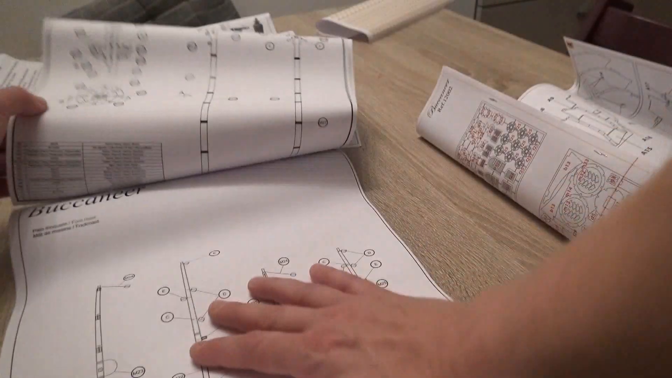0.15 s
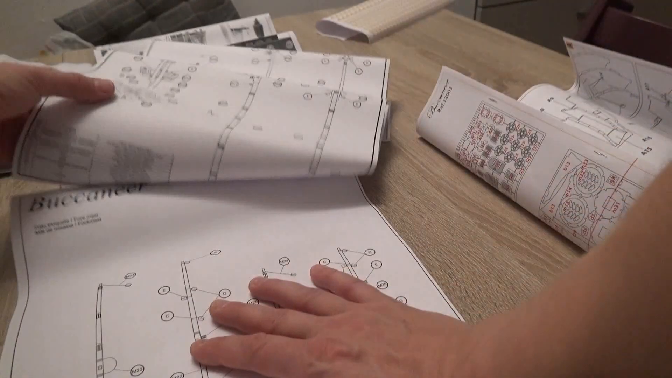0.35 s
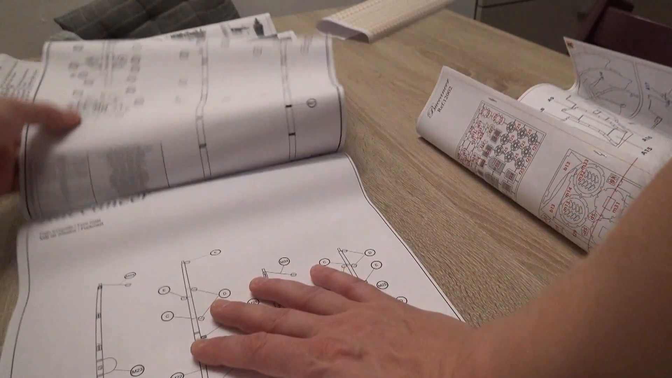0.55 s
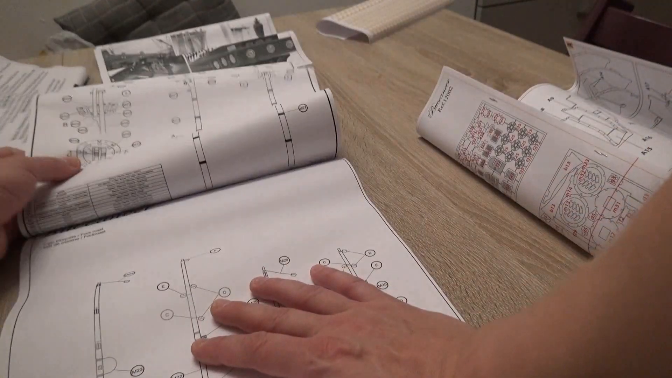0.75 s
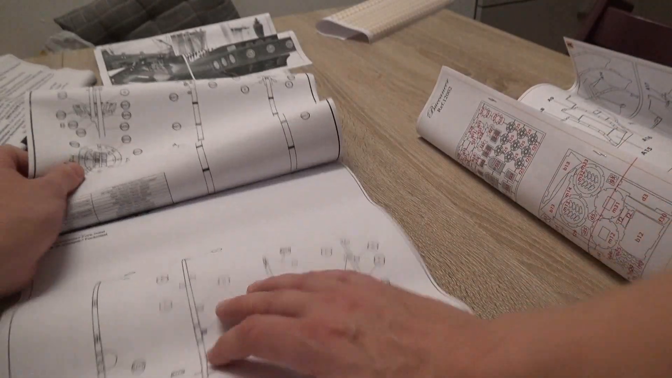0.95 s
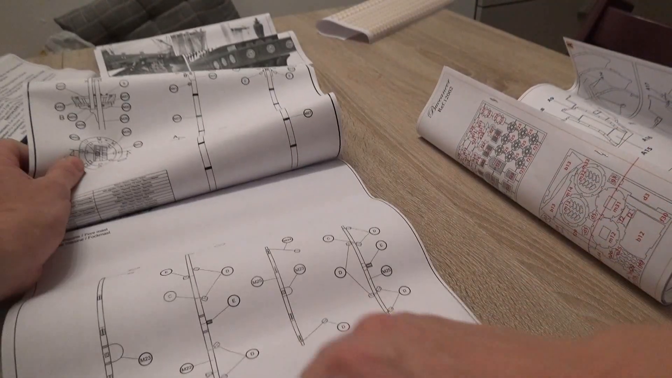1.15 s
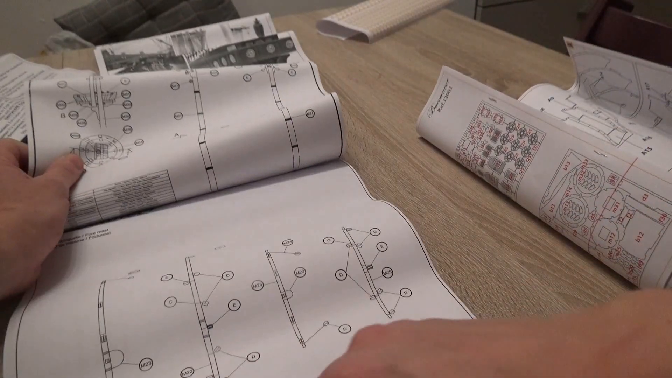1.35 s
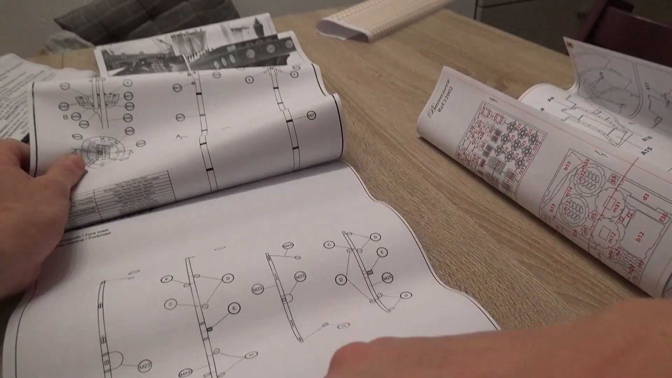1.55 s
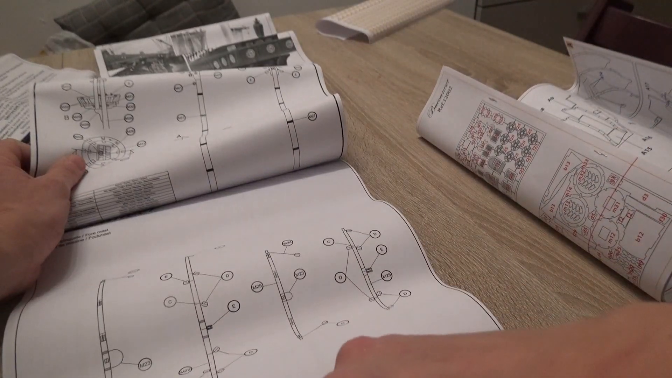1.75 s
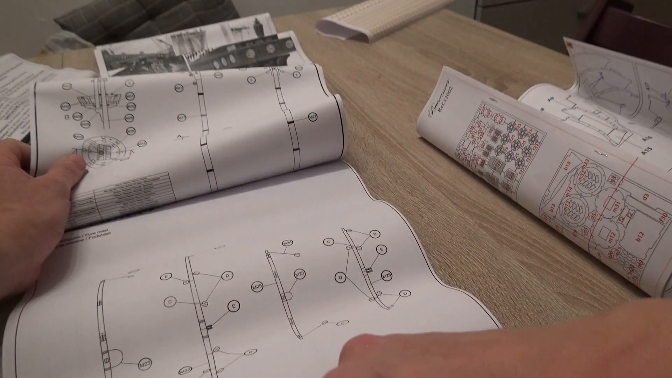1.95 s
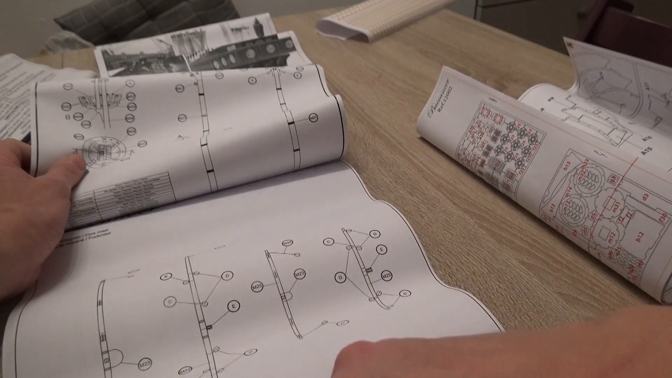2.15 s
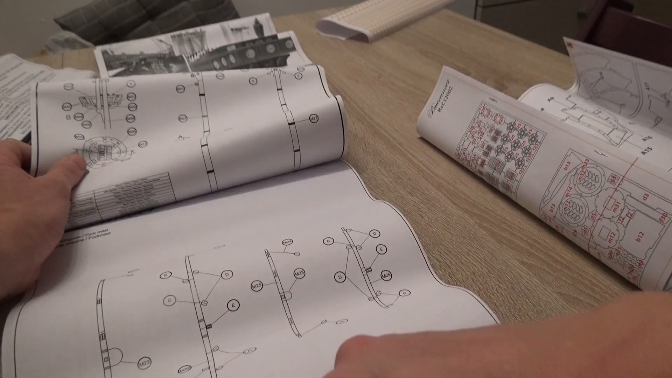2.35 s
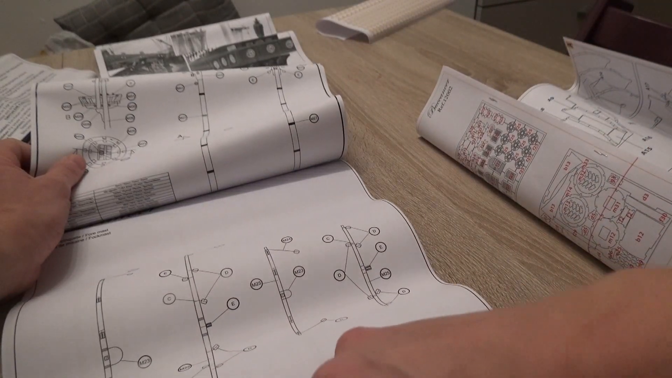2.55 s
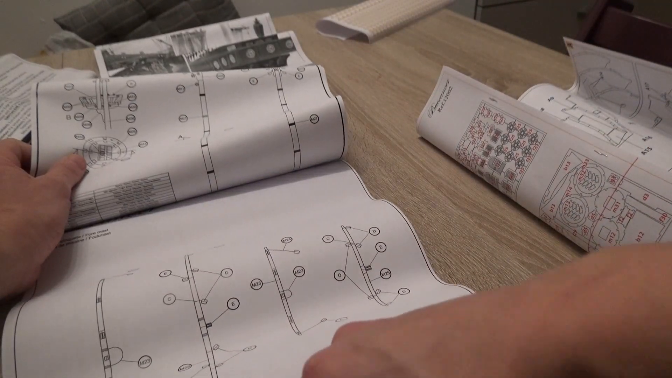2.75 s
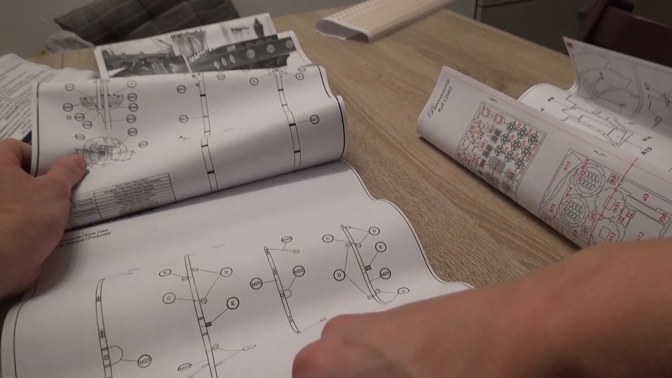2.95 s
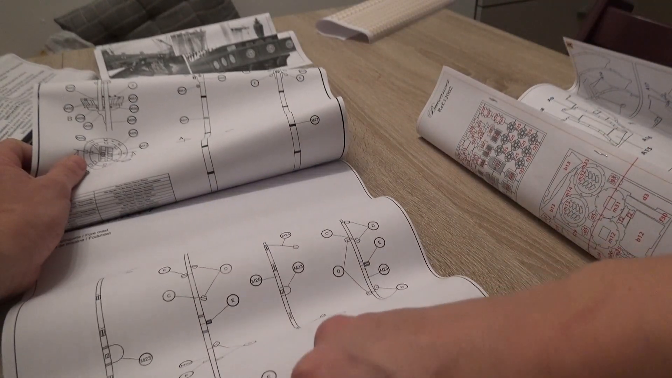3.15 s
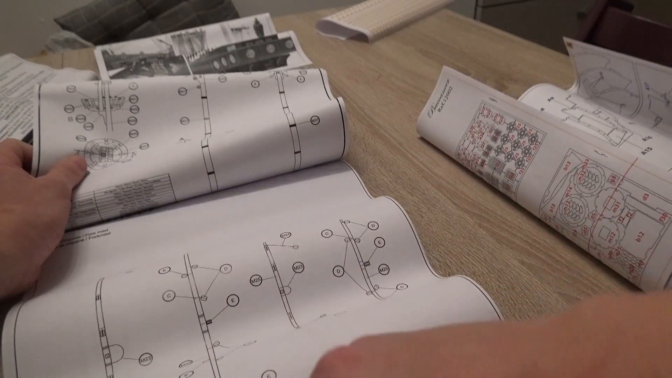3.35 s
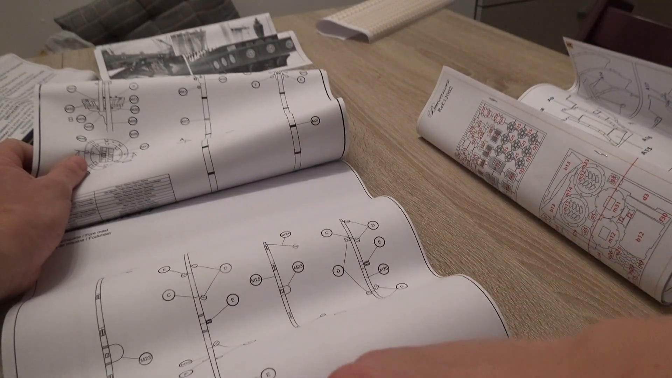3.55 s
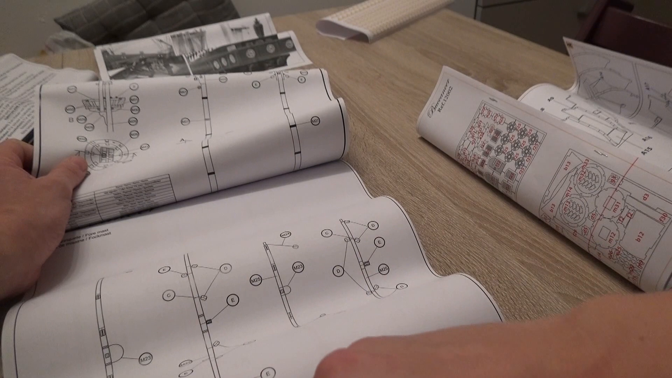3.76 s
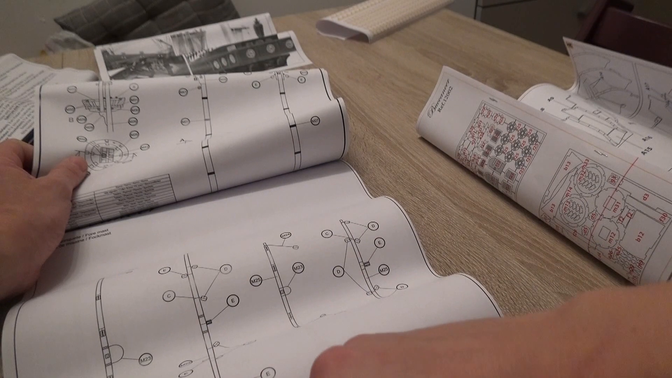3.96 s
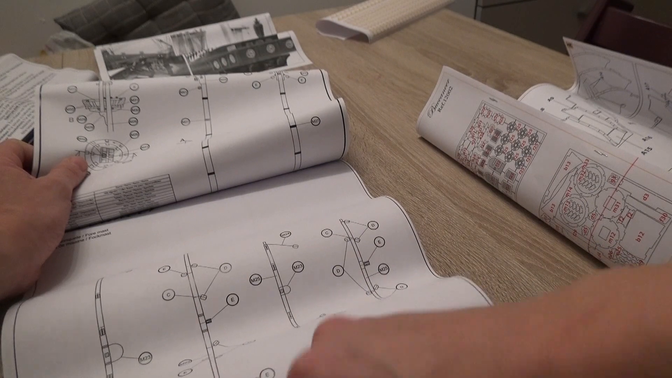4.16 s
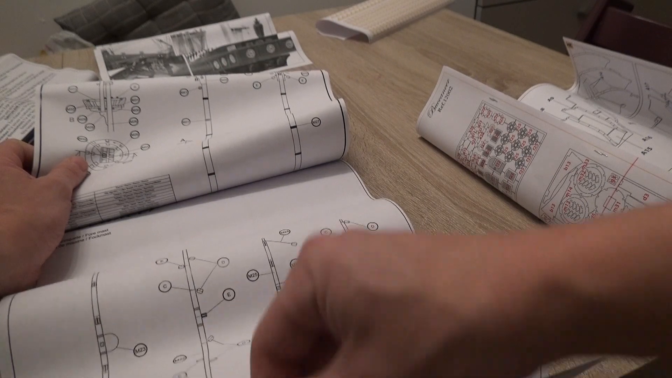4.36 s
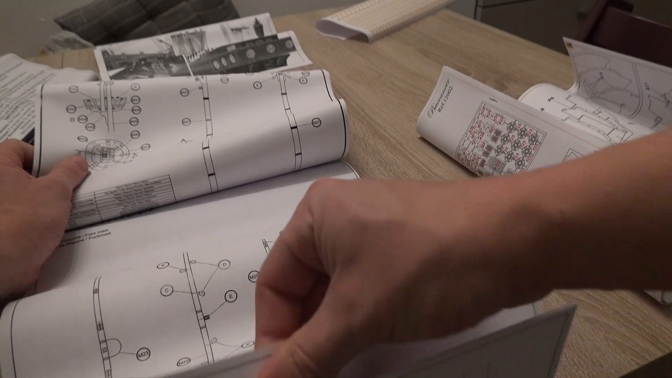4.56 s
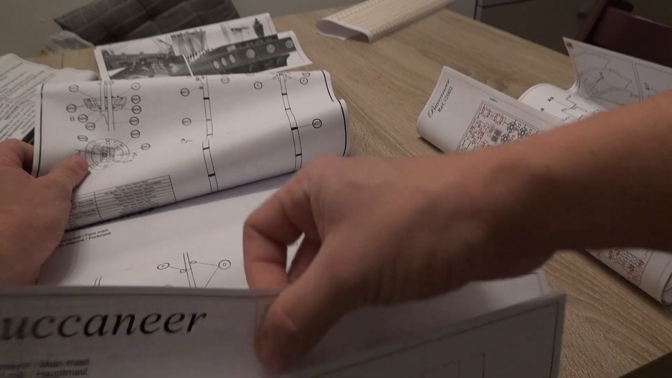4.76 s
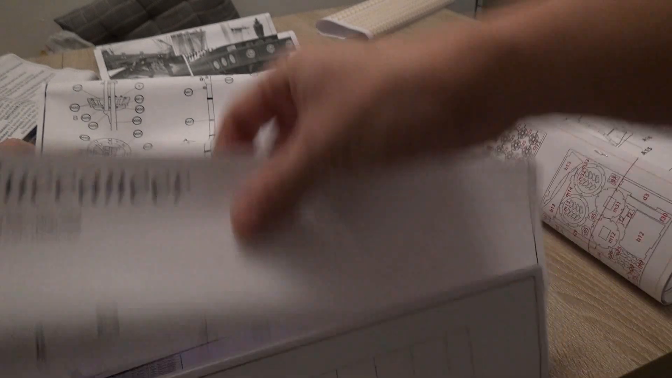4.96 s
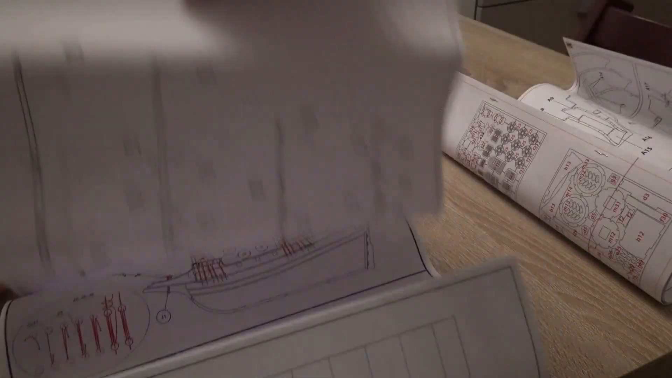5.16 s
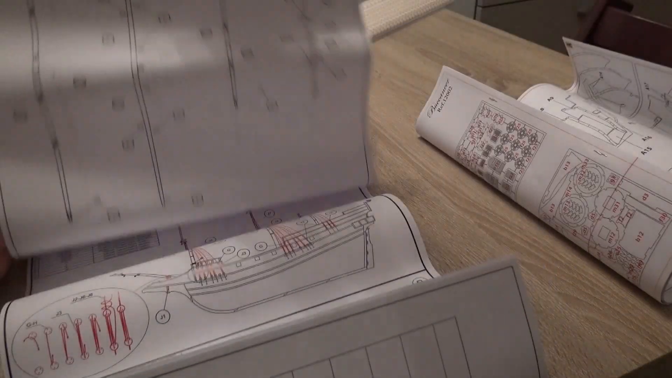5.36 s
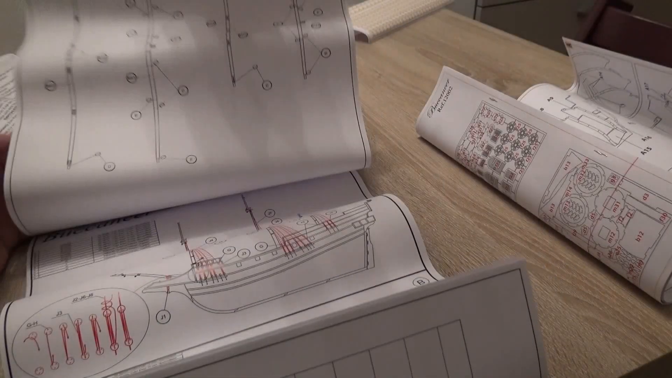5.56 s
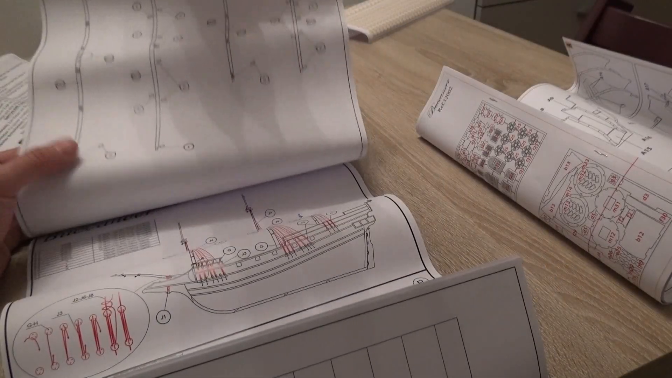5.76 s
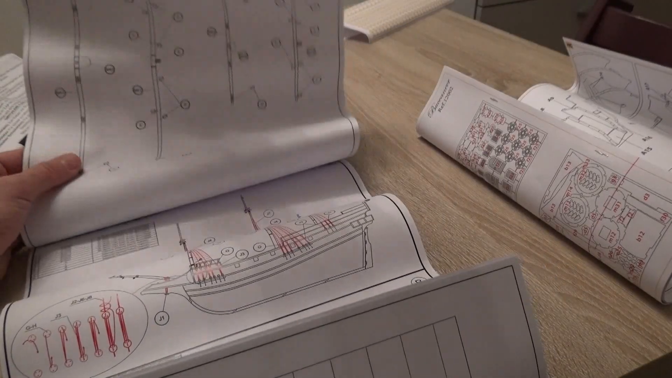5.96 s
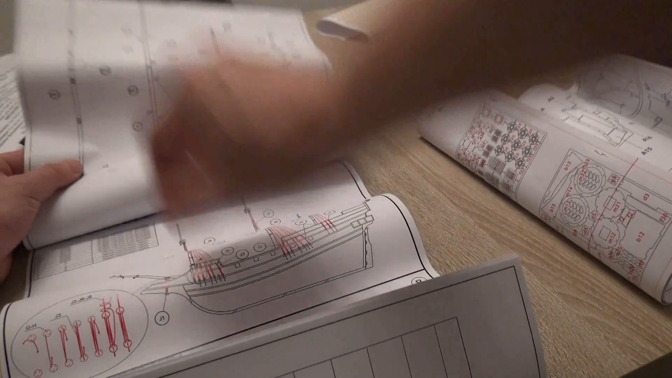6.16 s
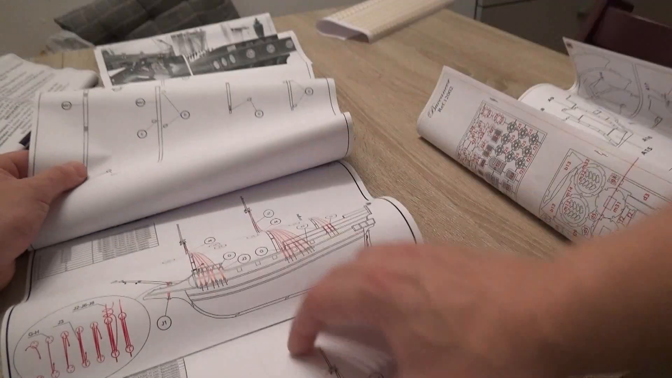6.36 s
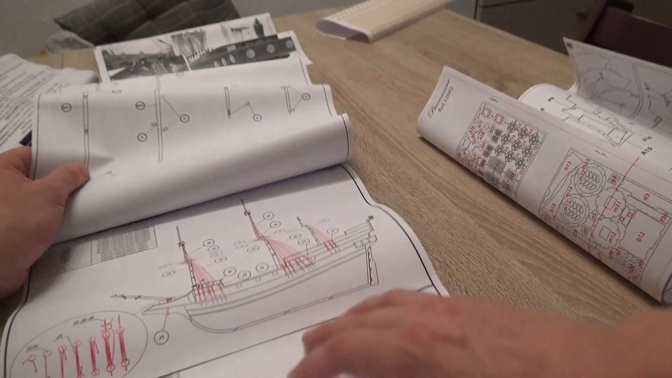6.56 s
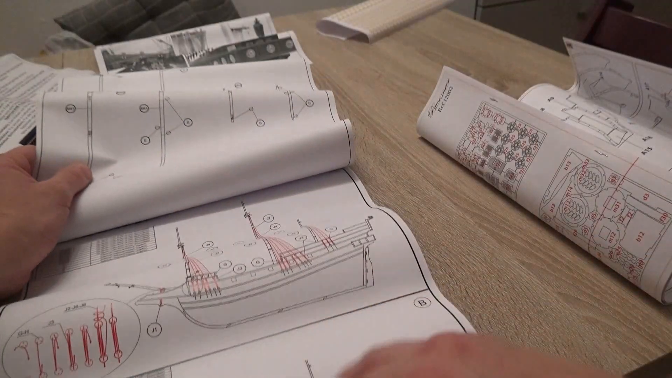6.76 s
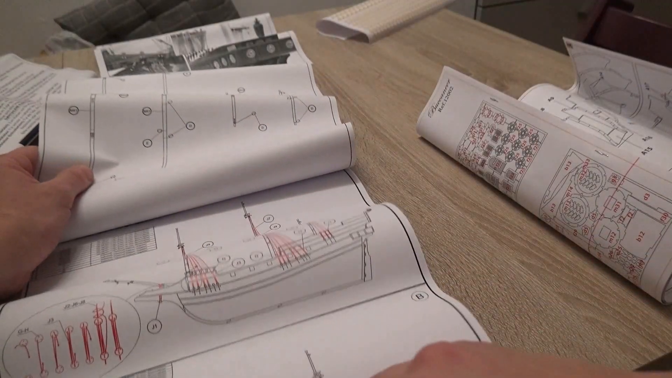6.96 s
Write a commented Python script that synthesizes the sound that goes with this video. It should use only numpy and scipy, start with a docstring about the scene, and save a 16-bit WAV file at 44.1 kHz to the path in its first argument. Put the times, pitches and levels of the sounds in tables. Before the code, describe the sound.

Close paper handling indoors: hollow pops, sharp crease snaps and grainy sliding, a quieter stretch of small rustles, then another sheet flipped over.

```python
"""Hollow pops and crumpling of bowed paper come at once, with a grainy hiss; large sheets are turned by hand.
Sliding is coloured grains under swelling gains; bending is grains ringing near 1 kHz plus low noise for wobble and air.
Pops, crease snaps and table bumps are short coloured bursts; a catching edge is a quick run of noise scrapes.
A soft low hum marks a sailing sheet. The small room adds a short tail and a faint steady noise."""
import sys
import numpy as np
from scipy import signal
from scipy.io import wavfile
from scipy.ndimage import uniform_filter1d

SR = 44100
rng = np.random.default_rng(int(sys.argv[2]) if len(sys.argv) > 2 else 0)


def to_wav(sig):
    """Store sig (one row per channel, or 1-D mono) as 16-bit WAV at the path in sys.argv[1].

    Samples outside -1..1 are clipped; the rate is SR.
    """
    pcm = np.clip(np.atleast_2d(sig), -1, 1) * 32767
    pcm = np.round(pcm).astype(np.int16)
    wavfile.write(sys.argv[1], SR, pcm.T)  # frames by channels


N = 308700


def amp(db):
    """Decibels to gain."""
    return 10 ** (np.asarray(db) / 20)


def unit(x):
    """Scales to rms 1."""
    return x / np.sqrt(np.mean(x ** 2) + 1e-20)


def read(points, hz):
    """Interpolates a spectrum on a log-frequency axis."""
    f, value = np.transpose(points)
    return np.interp(np.log(hz + 1e-6), np.log(f), value)


def curve(points):
    """Interpolates a (t/s, value) table to one value a sample."""
    s, value = np.transpose(points)
    return np.interp(np.arange(N) / SR, s, value)


def add(mix, start_s, sound):
    """Adds a sound to the mix in place, cut at the end."""
    part = mix[max(round(start_s * SR), 0):][:len(sound)]
    part += sound[:len(part)]


def colour(x, points, stretch=1, size=2048):
    """Minimum-phase filter, so attacks stay sharp; stretch multiplies the frequencies of its spectrum."""
    hz = abs(np.fft.fftfreq(size, 1 / SR)) / stretch
    log_gain = np.log(amp(read(points, hz)))
    response = np.exp(np.conj(signal.hilbert(log_gain)))
    taps = np.fft.ifft(response).real
    return signal.oaconvolve(x, taps[:size // 2])[:len(x)]


def noise(points, size=2048):
    """Steady coloured noise of rms 1."""
    return unit(colour(rng.standard_normal(N), points, size=size))


def grains(per_s, spread_db, smooth):
    """Tiny slips of uneven size over a bed of countless smaller ones."""
    size_db = spread_db * np.minimum(rng.exponential(1, N), 4)
    sizes = amp(size_db) * rng.choice([-1, 1], N)
    struck = rng.random(N) < per_s / SR
    return unit(unit(sizes * struck) + smooth * rng.standard_normal(N))


def flutter(depth_db, size):
    """Uneven contact pressure: random gain, smoothed twice over size samples."""
    drift = uniform_filter1d(uniform_filter1d(rng.standard_normal(N), size), size)
    return amp(depth_db * unit(drift))


def burst(points, centre_hz, decay_s, size=4096):
    """Dying cluster of clicks, coloured; its strongest 3 ms have rms 1."""
    t = np.arange(size) / SR
    cluster = rng.choice([-1, 1], size) * np.exp(-t / max(decay_s, 1e-4))
    x = colour(cluster, points, centre_hz)
    return x / np.sqrt(uniform_filter1d(x ** 2, size=132, mode="constant").max())


def swell(peak_s, rise_s, fall_s, drop_db=10, roundness=1.26):
    """Power of one movement, peak 1: drop_db down one rise before the peak and one fall after it."""
    t = np.arange(0, N, 64) / SR - peak_s
    away = np.maximum(-t / max(rise_s, 1e-3), t / max(fall_s, 1e-3))
    return amp(-drop_db * away ** roundness) ** 2


def movements(rows):
    """Gain a sample of overlapping movements (t/s, rise/s, fall/s, level/dB); their powers add."""
    power = sum(amp(db) ** 2 * swell(s, rise, fall) for s, rise, fall, db in rows)
    return np.interp(np.arange(N), np.linspace(0, N, len(power)), np.sqrt(power))


# room noise spectrum: f/Hz, level/dB
ROOM_TONE_SPECTRUM = [(15, -39), (25, 1), (205, -1), (275, -1), (746, -13.5), (809, 1.5), (1210, 1),
                      (2250, -12), (6800, -13.5), (15700, -23)]


def room_tone(level_db=-55.5):
    """Faint steady coloured noise of the quiet room."""
    return amp(level_db) * noise(ROOM_TONE_SPECTRUM, size=8192)


# turned sheet sailing over: peak t/s, rise/s, fall/s, level/dB
SAIL_MOVES = [(5.46, .17, .15, -47)]
# hum of the whole sheet: f/Hz, level/dB
SAIL_SPECTRUM = [(90, -31), (160, -8), (195, 0), (235, -8), (400, -38)]


def sailing():
    """The whole free sheet hums low while it swings through the air."""
    return movements(SAIL_MOVES) * noise(SAIL_SPECTRUM, size=8192)


# hand or slack sheet on the table: t/s, level before crest allowance/dB, f/Hz
TABLE_BUMPS = [(0.657, -23, 573), (1.258, -30.5, 169), (1.324, -30, 86), (1.973, -32, 167),
               (2.69, -36, 140), (2.719, -33.5, 130), (2.73, -36, 276), (3.185, -34.5, 130),
               (3.862, -27.5, 260), (5.037, -22.5, 430), (5.058, -18.5, 450), (5.07, -32.5, 104),
               (5.238, -38.5, 85), (5.689, -30.5, 446), (6.409, -26, 560)]
# thud spectrum: f re its pitch [ratio], level/dB
THUD_SPECTRUM = [(.15, -33), (.5, 0), (1, 6.5), (2.2, -5), (5, -13.5), (16, -53)]


def bumps(crest_db=5, decay_cycles=2.94):
    """Soft blows on the table top; each dies within a few cycles, so low ones last longer."""
    out = np.zeros(N)
    for s, db, hz in TABLE_BUMPS:
        add(out, s, amp(db - crest_db) * burst(THUD_SPECTRUM, hz, decay_cycles / hz))
    return out


# edge catching and slipping: t/s, level before crest allowance/dB
EDGE_SLIPS = [(2.282, -41), (3.1276, -27.5), (4.415, -24.5), (4.461, -27), (4.518, -25.5), (4.5636, -22.5),
              (4.6075, -22), (4.6502, -23.5), (4.68, -24), (5.892, -21), (6.365, -14)]
# scrape spectrum: f/Hz, level/dB
SCRAPE_SPECTRUM = [(60, -8), (400, 7.5), (1500, 3.5), (3000, 0), (6500, 2.5), (11000, -2), (16000, -18)]


def slips(crest_db=8, length_s=0.015, size=6000):
    """The edge lets go at once, scrapes for a moment and sticks again."""
    out = np.zeros(N)
    t = np.arange(size) / SR
    fade = np.exp(-(t / length_s) ** 2)
    for s, db in EDGE_SLIPS:
        scrape = unit(colour(rng.standard_normal(size), SCRAPE_SPECTRUM))
        add(out, s, amp(db - crest_db) * scrape * fade)
    return out


# sheet sliding over sheet: t of top speed/s, rise/s, fall/s, rasp level before trim/dB,
# hiss re rasp before trim/dB
SLIDE_STROKES = [(.03, 0.17, 0.68, -37.5, -5), (.33, 0.35, 0.23, -32, -6), (.58, 0.054, 0.061, -36.5, 4.5),
                 (.63, 0.033, 0.13, -23, -9), (.84, 0.044, 0.054, -30.5, -7.5),
                 (.98, 0.085, 0.11, -33, -11.5), (1.11, 0.14, 0.084, -37, -5), (1.24, 0.044, .04, -44, 3.5),
                 (1.419, 0.31, 0.4, -47, -2.5), (1.61, 0.078, 0.084, -44.5, -4.5),
                 (1.782, .02, 0.037, -45, -13), (1.94, 0.074, 0.34, -50.5, -9.5),
                 (2.32, 0.071, 0.028, -50, -7.5), (2.49, .05, 0.073, -53, -9),
                 (2.79, 0.012, 0.025, -54, -9), (3.12, 0.054, 0.096, -42.5, -8),
                 (3.57, 0.058, 0.04, -49, -6), (3.72, 0.13, 0.75, -58, -15), (4.15, 0.068, 0.048, -38, -4),
                 (4.3, 0.049, 0.062, -39, -10), (4.5, 0.2, 0.17, -50, -9), (4.78, 0.095, 0.29, -39, -5.5),
                 (4.96, 0.044, 0.11, -45, 5.5), (5.09, 0.052, 0.021, -44, 2.5),
                 (5.16, 0.04, 0.42, -43, -10.5), (5.546, 0.089, 0.086, -33, -0.5),
                 (5.68, 0.039, 0.11, -41, -4.5), (5.934, 0.039, 0.029, -31, 0.5),
                 (6.01, 0.097, 0.15, -41, -6.5), (6.18, 0.077, 0.04, -40.5, -4.5),
                 (6.42, 0.093, 0.22, -38.5, -5.5), (6.72, 0.24, 0.27, -43, -4.5)]


def rubbing():
    """How hard the sheets rub on each other."""
    return movements(row[:4] for row in SLIDE_STROKES)


# sheet bent: t of tightest bend/s, rise/s, fall/s, crumple level before trim/dB, wobble level/dB
SHEET_BENDS = [(.01, 0.06, 0.035, -15, -30), (.08, 0.071, 0.086, -29, -31.5), (.64, 0.036, 0.056, -41, -30),
               (.73, 0.074, 0.038, -29, -54), (0.839, 0.045, 0.055, -30, -31),
               (1.12, 0.072, 0.17, -38, -40.5), (1.63, 0.037, 0.085, -31, -39),
               (1.775, 0.034, 0.048, -35.5, -45), (1.98, 0.06, 0.043, -48, -65),
               (2.48, .04, .08, -48.5, -74), (2.735, .015, 0.043, -41, -45), (3.16, 0.088, 0.035, -41, -58),
               (3.59, 0.099, 0.03, -43, -55), (3.75, 0.1, .17, -47.5, -43),
               (4.14, 0.094, 0.027, -36.5, -52), (4.66, 0.16, 0.046, -43, -44.5),
               (4.89, 0.034, 0.049, -53, -42), (5.06, 0.04, 0.049, -42, -41),
               (5.58, 0.051, 0.027, -32, -59), (5.92, 0.094, 0.063, -43, -45),
               (6.22, 0.19, 0.058, -46, -43), (6.38, 0.044, 0.06, -28.5, -47),
               (6.46, 0.12, 0.078, -24, -37), (6.7, 0.37, 0.12, -34, -74)]
# swinging sheet fanning the air: peak t/s, rise/s, fall/s, level before trim/dB
AIR_GUSTS = [(.76, 0.13, 0.15, -44), (1.33, 0.22, .08, -48), (2, 0.13, 0.045, -46),
             (2.74, 0.037, 0.045, -48.5), (4.45, 0.52, 0.38, -53), (5.25, 0.17, 0.33, -50),
             (5.69, 0.024, 0.17, -43.5), (6, 0.26, 0.15, -54), (6.93, .1, 0.16, -54)]
# hold on the sheet: t/s, power share of crumpling that rings higher [0-1]
TAUT_SHARE = [(3.55, 0), (3.7, 0.94), (4.3, 0.4), (4.498, 0.1), (5.9, 0.3), (6.3, 0.06)]
# spectra of crumpling, wobble and moved air: f/Hz, level/dB
CRUMPLE_SPECTRUM = [(200, -32), (600, -15), (720, -17), (880, -1.5), (1050, 0), (1300, -3.5), (1600, -5),
                    (2000, -14.5), (3200, -20), (8000, -73)]
WOBBLE_SPECTRUM = [(100, -21), (210, -15), (275, 3.5), (350, -3.5), (500, 3), (650, -2.5), (850, -6),
                   (2000, -55.5)]
AIR_SPECTRUM = [(10, -12), (30, 5), (60, -4), (120, 3.5), (170, 6.5), (230, 2), (400, -11.5), (1500, -69)]


def bending(crumple_trim_db=-4.0, air_trim_db=-0.5, taut_factor=1.65,
            slide_crumple_db=-3, slide_wobble_db=-8, wobble_air_db=-11.5):
    """Small buckles ring near 1 kHz, higher when taut; wobble moves air, and sliding shakes the sheet too."""
    rub = rubbing()
    crumple_moves = movements(row[:4] for row in SHEET_BENDS)
    wobble_moves = movements((s, rise, fall, db) for s, rise, fall, _, db in SHEET_BENDS)
    crumple = np.hypot(crumple_moves, amp(slide_crumple_db) * rub)
    wobble = np.hypot(wobble_moves, amp(slide_wobble_db) * rub)
    fanning = np.hypot(movements(AIR_GUSTS), amp(wobble_air_db) * wobble)

    def ringing(stretch):
        """Grains ringing the sheet, with its spectrum stretched."""
        return unit(colour(grains(per_s=520, spread_db=6.0, smooth=1.0), CRUMPLE_SPECTRUM, stretch))

    taut = np.clip(curve(TAUT_SHARE), 0, 1)
    ring = np.sqrt(1 - taut) * ringing(1) + np.sqrt(taut) * ringing(taut_factor)
    small = amp(crumple_trim_db) * crumple * ring
    broad = wobble * noise(WOBBLE_SPECTRUM)
    air = amp(air_trim_db) * fanning * noise(AIR_SPECTRUM, size=8192)
    return small + broad + air


# bowed sheet flipping: t/s, level/dB, f/Hz
SHEET_BUCKLES = [(.013, -12, 1050), (0.056, -15, 1180), (.078, -19.5, 950), (.488, -28, 830),
                 (.86, -29.5, 930), (1.029, -17, 1080), (1.052, -23, 1050), (1.12, -21, 1050),
                 (1.268, -30, 920), (1.5421, -22, 1020), (1.611, -24.5, 1110), (1.647, -16.5, 1230),
                 (1.66, -17.5, 1110), (2.7191, -24, 1020), (2.728, -31.5, 1110), (3.132, -25, 1090),
                 (3.731, -37.5, 860), (4.146, -31, 1630), (4.909, -29, 1170), (5.036, -28, 990),
                 (5.065, -29, 905), (5.206, -34.5, 990), (5.585, -31.5, 1310), (5.9425, -23, 1370),
                 (6.374, -24, 910), (6.389, -16.5, 1120), (6.406, -20, 980), (6.432, -18, 830),
                 (6.453, -13.5, 1420), (6.462, -12, 965), (6.789, -34, 1000), (6.908, -30.5, 900)]
# hollow pop spectrum: f re its pitch [ratio], level/dB
POP_SPECTRUM = [(.04, -20.5), (.14, -14), (.45, -9), (.65, -9), (.87, 4), (1.08, 1), (1.5, -10), (1.9, -16),
                (3.2, -38.5), (9, -52)]


def buckles():
    """A bulge in the sheet flips over with a dull pop."""
    out = np.zeros(N)
    for s, db, hz in SHEET_BUCKLES:
        add(out, s, amp(db) * burst(POP_SPECTRUM, hz, decay_s=0.0049))
    return out


# crease snapping: t/s, crack level/dB, crack f/Hz, pop level/dB
CREASE_SNAPS = [(.155, -19, 4360, -26.5), (.25, -25.5, 3590, -27.5), (.371, -11, 3140, -19.5),
                (.608, -11, 5200, -16), (0.7461, -26, 4000, -15.5), (.799, -17, 2900, -16.5),
                (.81, -17, 3380, -21), (.948, -14, 3700, -14), (1.304, -35, 5530, -33.5),
                (1.436, -32.5, 4750, -35.5), (1.6493, -25.5, 2580, -20), (1.903, -37.5, 3570, -46),
                (1.932, -33.5, 2690, -36), (1.943, -35, 5800, -33), (1.9729, -23.5, 2880, -32),
                (2.6368, -45.5, 4930, -44), (3.0178, -40.5, 4800, -45), (3.1612, -27, 5300, -21.5),
                (3.861, -27, 7900, -24.5), (4.03, -38, 4760, -50), (4.45, -28.5, 5300, -34),
                (4.7684, -17, 2460, -23), (4.8611, -17, 2630, -18.5), (5.687, -21, 5100, -44),
                (5.856, -32.5, 4740, -40), (6.3001, -14.5, 5200, -24.5)]
# crack spectrum: f re its centre [ratio], level/dB
CRACK_SPECTRUM = [(.03, -26), (.15, -5), (.42, -5), (.57, 0.5), (.75, -5), (1.02, -0.5), (1.3, -5),
                  (1.9, -11.5), (2.7, -15.5), (4, -26)]


def snaps(pop_hz=1050, lag_s=0.001125):
    """High bending waves travel fastest: the crack comes first, the hollow pop just after."""
    out = np.zeros(N)
    for s, crack_db, hz, pop_db in CREASE_SNAPS:
        add(out, s, amp(crack_db) * burst(CRACK_SPECTRUM, hz, decay_s=0.0038))
        add(out, s + lag_s, amp(pop_db) * burst(POP_SPECTRUM, pop_hz, decay_s=0.0042))
    return out


# spectra of coarse rasp and fine hiss: f/Hz, level/dB
RASP_SPECTRUM = [(300, -21.5), (900, -6.5), (1400, 0.5), (1900, -1.5), (3200, -1.5), (5800, -2.5),
                 (7500, -4), (12000, -30)]
HISS_SPECTRUM = [(3000, -22), (5500, -5.5), (7000, -7), (8500, -3), (10000, -4.5), (12500, -8),
                 (14000, -15), (16000, -20)]


def sliding(rasp_trim_db=1.37, hiss_trim_db=4.5):
    """Fibres catch and let go; rasp and hiss share the pressure of the contact."""
    hiss = movements((s, rise, fall, db + fine_db) for s, rise, fall, db, fine_db in SLIDE_STROKES)
    rasp_grains = unit(colour(grains(per_s=1600, spread_db=3.5, smooth=1.4), RASP_SPECTRUM))
    hiss_grains = unit(colour(grains(per_s=4000, spread_db=1.5, smooth=1.0), HISS_SPECTRUM))
    coarse = amp(rasp_trim_db) * rubbing() * rasp_grains
    fine = amp(hiss_trim_db) * hiss * hiss_grains
    return (coarse + fine) * flutter(depth_db=1.12, size=300)


def reshaping(x, depth_db=2.0, bins=9, frames=14):
    """Paper resonances shift as it changes shape: smoothed random gains over time and frequency."""
    z = signal.stft(x, nperseg=1024, noverlap=768)[2]
    patches = rng.standard_normal(z.shape[::-1])
    for _ in range(2):
        patches = uniform_filter1d(patches, bins, axis=1)
        patches = uniform_filter1d(patches, frames, axis=0)
    colours = unit(amp(depth_db * unit(patches.T)))
    return signal.istft(z * colours, nperseg=1024, noverlap=768)[1][:N]


# room decay: f/Hz, t60 before division by decay_speed/s
ROOM_DECAY = [(100, 0.31), (500, 0.41), (1200, 0.23), (4000, 0.38), (9000, 0.17), (16000, 0.43)]


def echoes(gap_s, decay_speed, size=26000):
    """Scattered reflections of energy 1, each band dying at its own speed."""
    sparse = rng.random(size) < 5000 / SR
    after_gap = np.arange(size) > gap_s * SR
    taps = rng.choice([-1., 1.], size) * sparse * after_gap
    hz, t, z = signal.stft(taps, SR, nperseg=256)
    decay = amp(-60 * t * decay_speed / read(ROOM_DECAY, hz)[:, None])
    tail = signal.istft(z * decay, SR, nperseg=256)[1]
    return tail / np.linalg.norm(tail)


def room(sources, gap_s, decay_speed):
    """Reflected sound: each source meets its own pattern of reflections."""
    tails = [signal.oaconvolve(x, echoes(gap_s, decay_speed))[:N] for x in sources]
    return sum(tails) / np.sqrt(len(sources))


# stereo width: f/Hz, side filter level/dB
SIDE_SPECTRUM = [(60, -22), (130, -9.5), (300, -18), (1000, -20), (2200, -18), (4000, -29.5), (7000, -6),
                 (9500, -6.5), (12000, -25)]
# where the hands work: t/s, left re right level/dB
HAND_PLACE = [(0.8, -0.1), (1.7, 1.7), (2.7, 1.5), (3.8, 2.7), (4.2, 1), (6.8, 0.6)]


def scene(rustle_wet_db=-6, blow_wet_db=-4, count=3):
    """All paper sounds in the room, at two closely spaced microphones."""
    tone = room_tone()
    rustle = sailing() + slips() + reshaping(bending() + sliding())
    # a sheet sends a different version of each blow in every direction; only the first is heard directly
    blows = [bumps() + buckles() + snaps() for _ in range(count)]
    sent = [amp(rustle_wet_db) * rustle + amp(blow_wet_db) * blow for blow in blows]
    mid = rustle + blows[0] + room(sent, gap_s=0.0046, decay_speed=0.76) + tone
    # early reflections from the sides differ between the microphones
    early = room([mid], gap_s=.0003, decay_speed=6)
    side = colour(early, SIDE_SPECTRUM)
    lean = np.sqrt(amp(curve(HAND_PLACE)))
    return np.array([mid * lean + side, mid / lean - side])


# microphone response: f/Hz, level/dB
MIC_RESPONSE = [(20, -10), (60, -2), (1700, 0), (2400, 0), (3100, 0), (4000, -1)]


def record(dry, edge_hz=15800):
    """Microphone colour, then a steep linear-phase low-pass."""
    heard = np.array([colour(channel, MIC_RESPONSE, size=4096) for channel in dry])
    low_pass = signal.firwin(511, edge_hz, window=("kaiser", 9), fs=SR)
    return signal.oaconvolve(heard, low_pass[None], "same")


dry = scene()
out = record(dry)
to_wav(out)
```